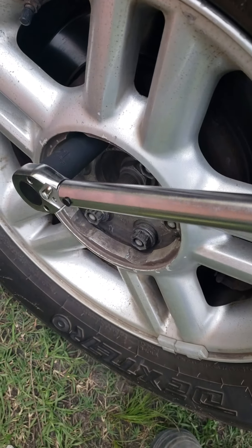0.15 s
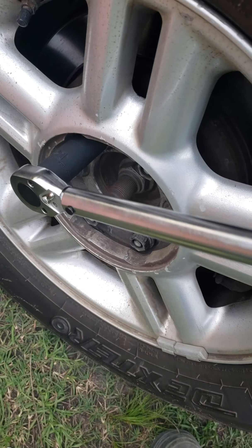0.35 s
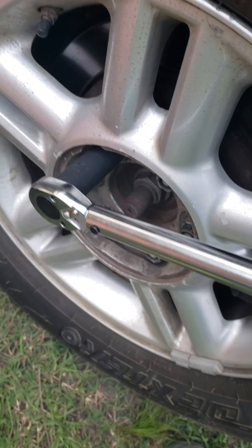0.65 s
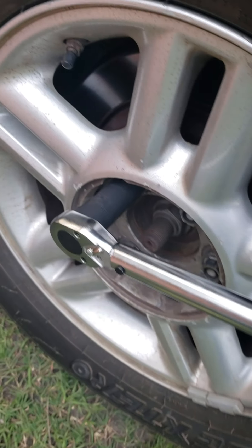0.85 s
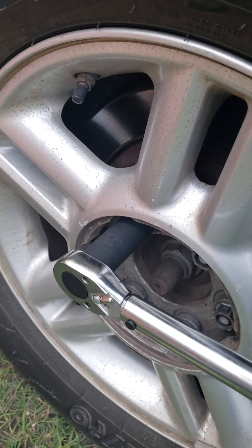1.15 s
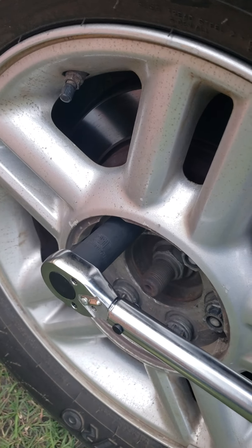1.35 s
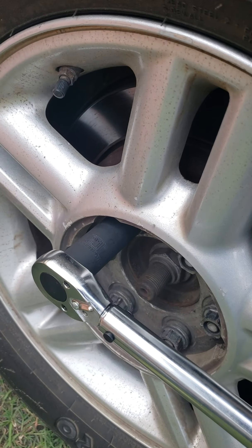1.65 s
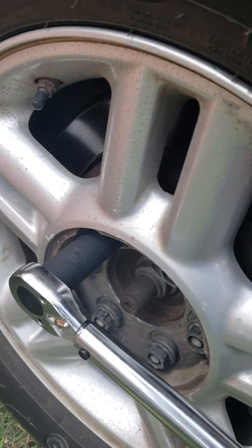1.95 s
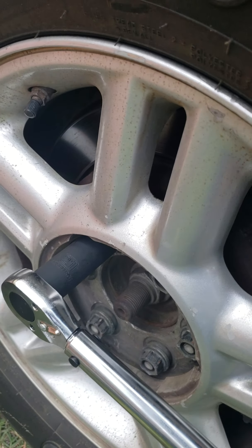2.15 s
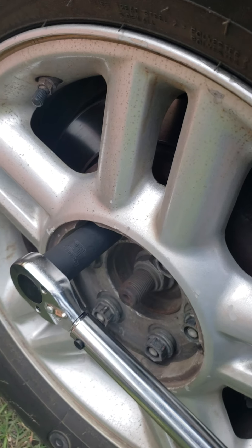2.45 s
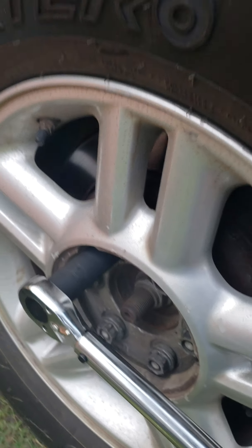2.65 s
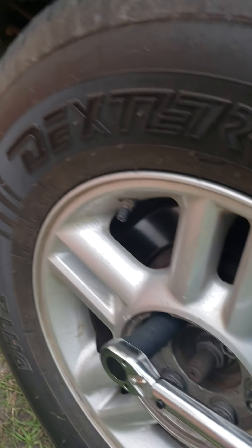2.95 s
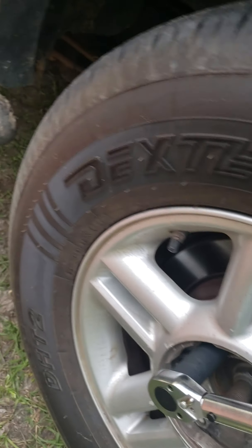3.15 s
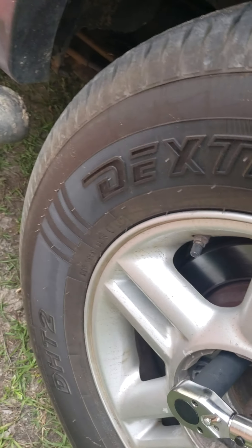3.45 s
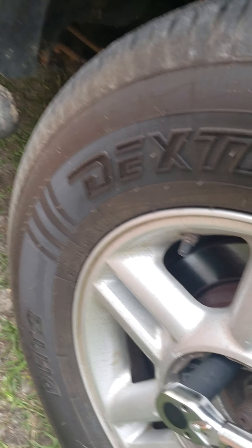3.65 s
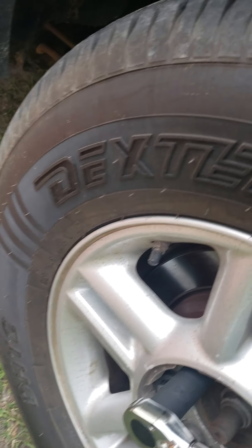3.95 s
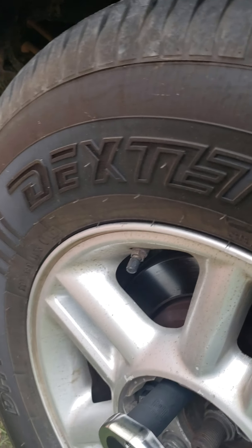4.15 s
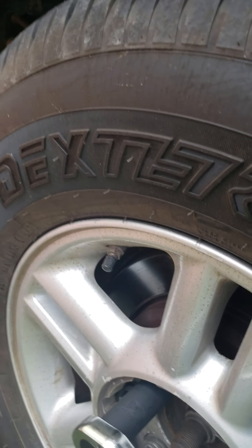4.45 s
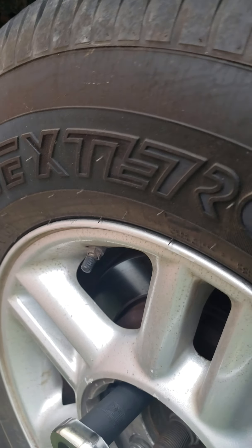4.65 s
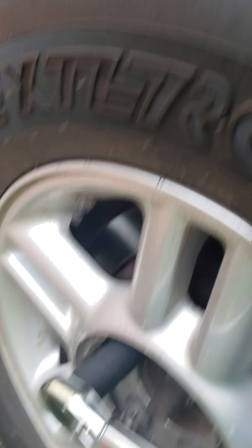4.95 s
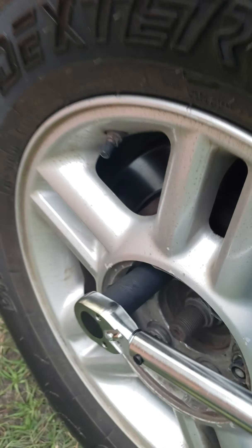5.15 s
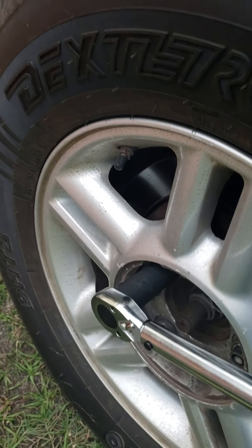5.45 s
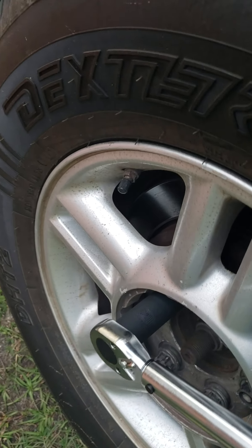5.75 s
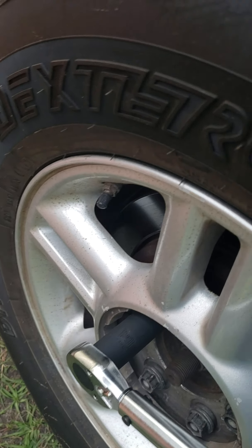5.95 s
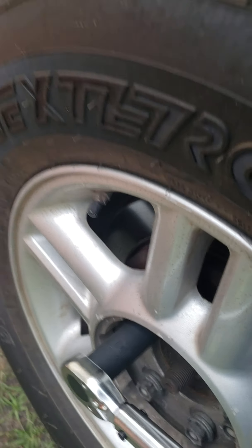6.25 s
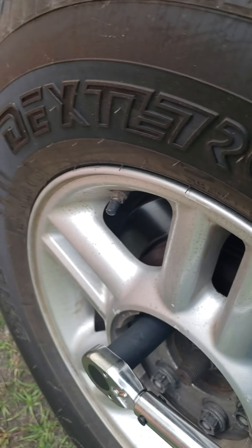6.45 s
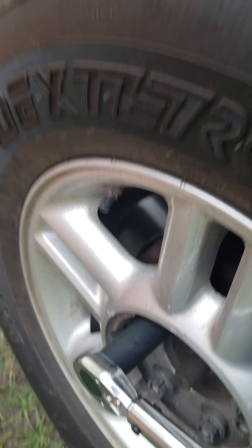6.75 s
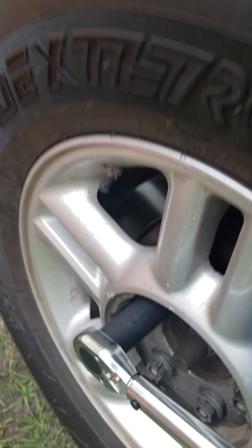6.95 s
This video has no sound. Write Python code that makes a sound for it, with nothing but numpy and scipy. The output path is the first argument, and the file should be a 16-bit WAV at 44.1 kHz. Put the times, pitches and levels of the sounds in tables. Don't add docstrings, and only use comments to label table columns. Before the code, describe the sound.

Close handheld phone outdoors on grass: low gusty rumble and thin distant wash. A wrench gives faint steel ticks and cloth rustles, then about midway its latch breaks with a hard bright crack and snaps back at once. Small clicks follow. Near the end a sharp blow knocks the alloy wheel, tyre thumping and rim ringing briefly, then a dry snap right at the microphone and a soft bump.

```python
import sys
import numpy as np
from scipy import signal
from scipy.fft import rfft, irfft, next_fast_len
from scipy.io import wavfile
from scipy.ndimage import uniform_filter1d

SR = 44100
rng = np.random.default_rng(int(sys.argv[2]) if len(sys.argv) > 2 else 0)


def persist_wave(psi):
    counts = np.round(np.clip(psi, -1, 1) * 32767).astype(np.int16)
    wavfile.write(sys.argv[1], SR, np.atleast_2d(counts).T)


def invert_db(level):
    return 10 ** (np.asarray(level, dtype=float) / 20)


N = 313683


def gain_at(hz, points):
    f, db = np.transpose(points)
    octave = np.log2(np.maximum(hz, 1))
    ends = np.log2(f)
    beyond = np.maximum(ends[0] - octave, 0) + np.maximum(octave - ends[-1], 0)
    return invert_db(np.maximum(np.interp(octave, ends, db) - 30 * beyond, -90))


def colour(x, points):
    size = 4096
    ceps = irfft(np.log(gain_at(np.fft.rfftfreq(size, 1 / SR), points)))
    ceps[1:size // 2] *= 2
    ceps[size // 2 + 1:] = 0
    taps = irfft(np.exp(rfft(ceps)))
    taps = taps / np.sqrt(np.sum(taps ** 2))
    return signal.fftconvolve(x, taps[None], axes=1)[:, :N]


def resonate(x, bands):
    out = 0
    for hz, width, db in bands:
        b, a = signal.iirpeak(hz, hz / width, fs=SR)
        out = out + invert_db(db) * signal.lfilter(b, a, x) * np.sqrt(1000 / width)
    return out


def walk(rate_hz, channels=1):
    k = max(int(SR / rate_hz), 2)
    held = np.repeat(rng.standard_normal((channels, N // k + 1)), k, axis=1)[:, :N]
    return 1.1 * uniform_filter1d(uniform_filter1d(held, k), k)


def pair(alike, length=N):
    mid, side = rng.standard_normal((2, length))
    alike = np.clip(alike, 0, 1)
    sides = side * np.array([[1], [-1]])
    return (np.sqrt(1 + alike) * mid + np.sqrt(1 - alike) * sides) / np.sqrt(2)


def add(out, s, sound):
    i = int(s * SR)
    out[:, i:i + sound.shape[-1]] += sound[..., :N - i]


def ring(modes, scatter_db, push_s=.0001):
    hz, db, t60 = np.transpose(modes)[:, :, None]
    t = np.arange(int(min(t60.max(), .6) * SR)) / SR
    waves = np.exp((2j * np.pi * hz - np.log(1000) / t60) * t) * invert_db(db) / (1 + (hz * push_s) ** 2)
    luck = scatter_db * rng.standard_normal((2, 2, len(modes)))
    heard = invert_db(luck[0]) * np.exp(.3j * luck[1])
    return np.imag(heard @ waves) * (1 - np.exp(-t / push_s))


def crack(t60_s, chatter_db, alike=0.19):
    t = np.arange(int(.25 * SR)) / SR - .0006
    chatter = invert_db(chatter_db * np.repeat(rng.standard_normal(len(t) // 30 + 1), 30)[:len(t)])
    fade = invert_db(-60 * t / max(t60_s, .004)) * chatter
    tail = invert_db(-27 - 60 * t / .12)
    return pair(alike, len(t)) * np.where(t > 0, fade + tail, .08)


def strike(track, modes, hits):
    for s, db in hits:
        add(track, s, invert_db(db) * ring(modes, scatter_db=1.5))


def strokes(rows, rise_db_s, fall_db_s):
    t = np.arange(0, N + 64, 64) / SR
    s, hold, db, *more = np.transpose(rows)[:, :, None]
    db = db - rise_db_s * np.maximum(s - t, 0) - fall_db_s * np.maximum(t - s - hold, 0)
    layers = [db] + [db + m for m in more]
    return [np.interp(np.arange(N) / SR, t, np.sqrt(np.sum(invert_db(2 * d), 0))) for d in layers]


# f/Hz, level/dB, decay/s
HEAD_MODES = [(9640, -1, 0.12), (9960, 0, .045), (11800, -5, .05), (14200, -6, .03), (10380, -5, .06)]


def ticks(rows):
    bright, dull, rings = np.zeros((3, 2, N))
    for s, bright_db, dull_db, t60_s, head_db in rows:
        add(bright, s, invert_db(bright_db) * crack(t60_s, chatter_db=1.8))
        add(dull, s, invert_db(dull_db) * crack(1.3 * t60_s, chatter_db=4.0))
        add(rings, s + .0006, invert_db(bright_db + head_db + 3) * ring(HEAD_MODES, scatter_db=1.5))
    return bright, dull, rings


def steel_noise(bright, dull):
    bright = colour(bright, [(7500, -10), (9500, -8.0), (12000, 3.5), (14000, -0.5), (15200, 4), (16000, -9)])
    dull = colour(dull, [(1200, -14.5), (2500, -5.0), (4500, 0.5), (6000, 6.0), (8000, -12.5)])
    return invert_db(-1.5) * bright + invert_db(-4.5) * dull


# f/Hz, width/Hz, level/dB
HOUSING_BANDS = [(2310, 210, -4.5), (3020, 190, -10.5), (3870, 170, -7), (4600, 130, -4), (4980, 160, -2),
                 (5300, 90, 2), (5877, 120, -8), (5880, 190, -1.5), (6990, 250, -6.5), (7950, 150, -7.5),
                 (8060, 130, -2)]
# t/s, bright level/dB, dull level/dB, decay/s
LATCH_CRACKS = [(3.007, -50, -47, .012), (3.012, -21, -32, .008), (3.0128, -16, -34, .007),
                (3.0141, -16, -34, .007), (3.0154, -17, -34, .012), (3.0212, -6.5, -28, .011),
                (3.0233, -15, -31, .015), (3.0252, -19, -33, .04), (3.0298, -29, -36, .035),
                (3.0344, -45, -42, .11), (3.1368, -26, -35, .018), (3.1483, -11, -26, .016),
                (3.1519, -20, -35, .024), (3.1563, -24, -34, .04), (3.1614, -25, -36, .03),
                (3.1655, -32, -40, .08), (6.1016, -9, -20, .01)]


def latch():
    bright, dull, rings = ticks([(*row, -26) for row in LATCH_CRACKS])
    noise = steel_noise(bright, invert_db(-3.5) * dull)
    return noise + invert_db(-1.5) * resonate(dull, HOUSING_BANDS), rings


# f/Hz, level/dB per Hz
PAWL_BRIGHT_SPECTRUM = [(7500, -15.5), (9500, -8), (11000, 9.5), (13000, 3), (15000, -2.5)]
PAWL_DULL_SPECTRUM = [(1200, -13), (1900, -8.5), (2500, -9), (3500, -15), (4500, 0.5), (5300, -6),
                      (7000, -1)]
# f/Hz, level/dB, decay/s
DRIVE_MODES = [(2480, 1, .22), (2550, -3, .16), (1215, -5, .1), (1300, -12, .2), (3225, -6, .1),
               (3634, -4, .1), (4377, -5, .1), (4800, -8, .1)]
# f/Hz, level/dB per Hz
DRIVE_BUZZ_SPECTRUM = [(2000, -3), (2600, -5), (3600, 2), (4600, -2)]
# t/s, bright level/dB, dull level/dB, head ring/dB against the bright, drive ring level/dB
PAWL_CLICKS = [
    (1.2419, -35, -47.5, -4, -59),
    (2.9032, -31.5, -61.5, -18, -77.5),
    (3.515, -41, -49.5, -8, -78),
    (4.1323, -31, -57, 0.5, -64),
]


def pawl():
    bright, dull, rings = ticks([(*row[:3], 0.0177, row[3]) for row in PAWL_CLICKS])
    drive_hits = [(row[0] + 0.0014, row[4]) for row in PAWL_CLICKS]
    drive, buzz = np.zeros((2, 2, N))
    strike(drive, DRIVE_MODES, drive_hits)
    for s, db in drive_hits:
        buzz_db = -52.5 + 0.95 * (db + 47.0)
        add(buzz, s, invert_db(buzz_db) * crack(0.17, chatter_db=6.0))
    noise = colour(bright, PAWL_BRIGHT_SPECTRUM) + colour(dull, PAWL_DULL_SPECTRUM)
    return noise + colour(buzz, DRIVE_BUZZ_SPECTRUM), rings, drive


# t/s, bright level/dB, dull level/dB
SMALL_TICKS = [(0.0495, -51, -62), (0.474, -78, -60), (1.155, -59, -64), (2.786, -51, -67),
               (2.8075, -52, -68), (2.8868, -49, -63), (2.9536, -50, -57), (3.1325, -40, -38.5),
               (3.409, -57, -64), (3.4763, -57, -61.5), (3.5454, -45, -52), (3.727, -43, -55),
               (4.2953, -71, -80), (4.344, -62, -63), (5.32, -44, -61), (5.391, -43.5, -60),
               (5.5308, -51, -80), (5.7235, -59, -72), (6.029, -38.5, -61), (6.404, -41, -59.5),
               (6.4245, -49, -67), (6.5914, -37.5, -70), (7.0463, -30.5, -63)]


def light_ticks():
    bright, dull, rings = ticks([(*row, 0.019, -36) for row in SMALL_TICKS])
    return steel_noise(bright, dull), rings


# t/s, level/dB
TUBE_MODES = [(5084, 0, 0.6)]
TUBE_STRIKES = [(3.024, -51)]
SPRING_MODES = [(4445, 0, .125)]
SPRING_STRIKES = [(3.031, -42), (3.157, -44), (3.164, -39)]
ROLLER_MODES = [(9960, 0, .045), (8350, -16, .03)]
ROLLER_STRIKES = [(3.022, -30), (3.1375, -38), (3.149, -12)]
PIN_MODES = [(6080, -5, 0.032), (6480, -3, 0.017), (5480, -14.5, 0.034)]
PIN_STRIKES = [(1.2425, -61), (2.9023, -30.5), (3.5134, -38.5), (4.1327, -38.5)]
TANG_MODES = [(5200, 0, .02), (6900, -6, .012)]
TANG_STRIKES = [(3.0125, -33), (3.0158, -27), (3.0216, -23), (3.0262, -32), (3.149, -31)]
PLATE_MODES = [(9640, 0, .15)]
PLATE_STRIKES = [(3.023, -29), (3.151, -36)]
COLLAR_MODES = [(3110, 0, .03)]
COLLAR_STRIKES = [(3.0295, -33), (3.041, -45)]
DETENT_MODES = [(14500, 0, .016), (13200, -5, .014)]
DETENT_STRIKES = [(3.1488, -9), (3.137, -28)]


def firm_parts():
    rings = np.zeros((2, N))
    strike(rings, TUBE_MODES, TUBE_STRIKES)
    strike(rings, SPRING_MODES, SPRING_STRIKES)
    strike(rings, ROLLER_MODES, ROLLER_STRIKES)
    strike(rings, PIN_MODES, PIN_STRIKES)
    strike(rings, TANG_MODES, TANG_STRIKES)
    strike(rings, PLATE_MODES, PLATE_STRIKES)
    strike(rings, COLLAR_MODES, COLLAR_STRIKES)
    strike(rings, DETENT_MODES, DETENT_STRIKES)
    return rings


# t/s, level/dB
HANDLE_MODES = [(3766, -17, .07), (2996, -18, .08), (853, -22, .25), (800, -28, .12)]
HANDLE_STRIKES = [
    (3.029, -34),
    (3.161, -31.5),
]
BEAM_MODES = [(2062, -20, .2), (2420, -17, .14), (2606, -23, .2), (3381, -22, .17), (3790, -13, .1),
              (4030, -15, .2), (4387, -14, .17), (4840, -18, .23), (5233, -12, .12), (5400, -22, .22),
              (5841, -14, .07)]
BEAM_STRIKES = [(3.03, -34), (3.152, -30.5), (3.166, -41)]
SOCKET_MODES = [(6500, -6, .13), (13600, 9, .09), (3940, -18, .12), (1780, -5, .06), (2789, -13, .08),
                (11900, -2, .08), (9300, -6, .08)]
SOCKET_STRIKES = [(3.41, -65), (3.479, -48.5), (4.296, -73), (4.345, -52.5)]
WALL_MODES = [(3940, 0, .16), (3850, -5, .1), (4060, -7, .1)]
WALL_STRIKES = [(4.3, -78), (4.356, -69)]
KNOCK_MODES = [(3930, 2, 0.05), (2720, 3, 0.059), (2440, -5, 0.079), (875, -5, 0.14)]
KNOCK_STRIKES = [
    (0.456, -70),
    (0.475, -57),
]


def loose_parts():
    rings = np.zeros((2, N))
    strike(rings, KNOCK_MODES, KNOCK_STRIKES)
    strike(rings, BEAM_MODES, BEAM_STRIKES)
    strike(rings, WALL_MODES, WALL_STRIKES)
    strike(rings, HANDLE_MODES, HANDLE_STRIKES)
    strike(rings, SOCKET_MODES, SOCKET_STRIKES)
    return rings


def squeak():
    out, length_s = np.zeros((2, N)), 0.024
    start_hz, sag_hz_per_s = 2030, 6700
    t = np.arange(int(length_s * SR)) / SR
    tone = np.sin(2 * np.pi * (start_hz - sag_hz_per_s * t / 2) * t)
    add(out, 4.26, invert_db(-49.5) * np.sin(np.pi * t / length_s) * tone)
    return out


def wrench():
    latch_noise, latch_rings = latch()
    pawl_noise, pawl_rings, drive = pawl()
    tick_noise, tick_rings = light_ticks()
    firm = latch_rings + pawl_rings + tick_rings + firm_parts() + squeak()
    loose = drive + loose_parts()
    rings = firm * invert_db(1.5 * walk(110)) + loose * invert_db(3.5 * walk(250) - 2)
    return latch_noise + pawl_noise + tick_noise + rings


# t/s, hold/s, level/dB, low groan/dB and higher groan/dB against the level
CREEP_SLIDES = [(0.53, .05, -80.5, 1, -20), (0.616, 0.28, -76.5, -6.5, -25), (3.418, 0.1, -81, -11.5, -4),
                (4.264, 0.071, -88, -18, 5), (4.342, 0.013, -75, -15, -7), (4.423, 0.049, -88.5, -23, 2)]
# f/Hz, width/Hz, level/dB
SOCKET_BANDS = [(1800, 380, 1), (2160, 400, -4), (2900, 1000, -9), (3680, 500, -10)]
LOW_GROAN_BANDS = [(500, 170, 0), (940, 150, 0)]


def creep():
    level, *groans = strokes(CREEP_SLIDES, rise_db_s=250, fall_db_s=180)
    t, starts = np.arange(N) / SR, np.array(CREEP_SLIDES)[:, 0]
    latest = np.maximum(np.searchsorted(starts, t) - 1, 0)
    since = np.clip(t - starts[latest], 0, .6)
    turns = np.cumsum(1 - .1 * (since - .18)) / SR
    gains, out = [level] * len(SOCKET_BANDS) + groans, 0
    for (hz, width, db), gain in zip(SOCKET_BANDS + LOW_GROAN_BANDS, gains):
        span = int(SR / width)
        cos, sin = (uniform_filter1d(uniform_filter1d(pair(0.36), span), span) * np.sqrt(span)
                    for _ in range(2))
        angle = 2 * np.pi * hz * turns
        out = out + gain * invert_db(db) * (cos * np.cos(angle) + sin * np.sin(angle))
    return out * invert_db(0.82 * walk(180) + 0.9 * walk(23) + 2.0)


# f/Hz, level/dB, decay/s
TYRE_MODES = [(331, 2, 0.082), (309.8, -10, 0.2), (367, -17.5, 0.024), (520, -11, 0.07), (593, -9.5, 0.051),
              (610, -8, 0.11), (780, -11.5, 0.12), (824, -19, 0.065)]
RIM_MODES = [(581, -13, 0.72), (575, 9, .08), (754, -12, 0.3), (867, 0.5, 0.25), (1470, -9, 0.18),
             (1728, 6, 0.11), (2170, -3, 0.09), (2611, -10, 0.15), (2900, -14, .2), (3004, -3, .11),
             (4344, -8, .3), (4522, -2, .11), (1000, -9, 0.1), (2400, -1, 0.05),
             (393, -12, .4), (520, -4, .06), (1085, -4, .07), (1195, -13, .26), (1350, -6, .14),
                (1943, -3, .07), (3120, -8, .08), (3795, -5, .13), (4100, -9, .2), (5658, -12, .2),
                (5846, -7, .12), (1900, 15, .009), (4500, 14, .012), (3000, 8, .01)]
CAP_MODES = [(9700, 0, .014), (10600, -1, .012), (11900, -6, .01)]
# t/s, level/dB
CAP_STRIKES = [
    (6.1019, -5),
    (6.1032, -11),
    (6.1085, -22),
    (6.1115, -22),
]
# t/s, level/dB
TYRE_BUMPS = [
    (3.04, -52),
    (3.164, -54),
    (5.759, -46),
    (6.64, -35.5),
    (6.923, -44.5),
    (7.003, -22.5),
]
# t/s, level/dB, rattle/dB against it, decay/s
GLANCING_SCUFFS = [(.418, -67, -12, .04), (.458, -60, -14, 0.13), (.475, -50, -15.5, 0.12),
                   (2.785, -58, -5.5, 0.14), (2.861, -59, -21.5, 0.41), (3.011, -48.5, -31, 0.24),
                   (3.154, -55, -20.5, 0.23), (3.519, -54, -8, 0.19), (3.536, -41.5, -30, 0.09),
                   (4.345, -63.5, -22, 0.17)]
# f/Hz, level/dB per Hz
SCUFF_SPECTRUM = [(300, -4), (650, 2.5), (1000, -3), (1600, 0), (2500, -10.5), (4000, -18)]
RATTLE_SPECTRUM = [(500, -8.5), (1500, -25), (3000, -10), (5000, -15), (7000, -7.5), (9000, -10.5),
                   (10000, 2), (12000, -5.5), (14000, -16), (16000, -19.5)]
HUB_SPECTRUM = [(3700, -4.5), (4050, 5.5), (4300, 0), (4550, 3.5), (4800, -10)]
# f/Hz, width/Hz, level/dB
SPOKE_BANDS = [(1180, 110, -9.5), (1950, 110, -0.5), (2330, 420, 3.5), (2900, 150, 0.5), (3740, 160, -2),
               (4200, 110, -0.5), (4390, 120, 0.5), (5870, 160, -7)]


def wheel():
    thumps, rattles, scuffs, hub = np.zeros((4, 2, N))
    blow_s, blow_db, blow_t60_s = 6.101, -15, 0.081
    rim = ring(RIM_MODES, scatter_db=1.0, push_s=0.0002)
    add(thumps, blow_s + 0.00079, invert_db(blow_db - 14.5) * rim)
    for s, db in CAP_STRIKES:
        add(thumps, s, invert_db(db) * ring(CAP_MODES, scatter_db=.5))
    add(rattles, blow_s, invert_db(blow_db + 2) * crack(blow_t60_s, chatter_db=0.0))
    # t/s, level/dB, scuff/dB against it, decay/s, push/s
    pushes = [(blow_s, blow_db, -2.5, blow_t60_s, 0.00076)]
    pushes += [(s, db, -38, 0.27, 0.0014) for s, db in TYRE_BUMPS]
    for s, db, scuff_db, t60_s, push_s in pushes:
        add(thumps, s + .0007, invert_db(db - 6) * ring(TYRE_MODES, scatter_db=.6, push_s=push_s))
        add(scuffs, s, invert_db(db + scuff_db - 6) * crack(1.6 * t60_s, chatter_db=2.6))
    for s, db, rattle_db, t60_s in GLANCING_SCUFFS:
        add(rattles, s, invert_db(db + rattle_db) * crack(t60_s, chatter_db=-2.5))
        add(scuffs, s, invert_db(db - 6) * crack(1.6 * t60_s, chatter_db=2.6))
    high = signal.butter(4, 250, "high", fs=SR, output="sos")
    thumps, scuffs = signal.sosfilt(high, [thumps, colour(scuffs, SCUFF_SPECTRUM)])
    t = np.arange(SR // 2) / SR
    add(hub, blow_s, pair(0.54, SR // 2) * invert_db(-47 - 60 * t / 0.42))
    hub = colour(hub * invert_db(1.3 * walk(130)), HUB_SPECTRUM)
    rattle = colour(rattles, RATTLE_SPECTRUM) + invert_db(-6) * resonate(rattles, SPOKE_BANDS)
    return hub + thumps * invert_db(1.5 * walk(120)) + scuffs + rattle


# t/s, f/Hz, level/dB, length/cycles
LEFT_SNAP = [(6.81594, 4600, -5, 3.0), (6.81606, 1950, -6, 2.0), (6.8158, 15500, -22, 8.0),
             (6.8158, 10500, -20, 6.0), (6.8168, 600, -29, 1.5), (6.8176, 3200, -37, 5.0)]
RIGHT_SNAP = [(6.8156, 12000, -8, 8.0), (6.8156, 15000, -4, 8.0), (6.8158, 3800, -25, 3.5),
              (6.8161, 11800, -24, 24.0), (6.8157, 7400, -33, 6.0), (6.8155, 380, -29, 1.5)]


def snap():
    out = np.zeros((2, N))
    for port, bursts in enumerate((LEFT_SNAP, RIGHT_SNAP)):
        for s, hz, db, cycles in bursts:
            turn = np.arange(int(cycles * SR / hz)) * hz / SR
            swell = np.sin(np.pi * turn / cycles)
            add(out[port:port + 1], s, invert_db(db) * swell * np.sin(2 * np.pi * turn))
    return signal.sosfilt(signal.butter(2, 250, "high", fs=SR, output="sos"), out)


# t/s, hold/s, fine rustle level/dB, coarse scrape/dB against it
CLOTH_STROKES = [(.04, 0.047, -75, -11), (.64, 0.17, -75.5, -10.5), (.955, 0.043, -58, -12),
                 (1.1, .03, -58.5, -8), (1.18, 0.12, -62.5, -22), (1.32, 0.053, -56, -28),
                 (1.39, 0.099, -51.5, -26.5), (1.6, 0.086, -52.5, -22), (1.83, 0.12, -56, -30),
                 (2.035, 0.057, -50.5, -24), (2.2, .16, -50.5, -16.5), (2.39, 0.049, -47, -13.5),
                 (2.6, 0.13, -61, -16.5), (2.77, 0.052, -57, -16), (2.9, 0.33, -65, -4.5),
                 (3.41, 0.17, -70.5, -7), (3.73, 0.045, -52.5, -15), (3.86, 0.035, -55.5, -14.5),
                 (3.95, 0.13, -52.5, -17), (4.34, 0.034, -71, -6.5), (4.8, 0.086, -72, -17),
                 (5.0, 0.18, -64, -13), (5.19, 0.16, -54.5, -14.5), (5.39, 0.02, -54.5, -13),
                 (5.53, 0.088, -62, -11.5), (5.74, 0.08, -58, -13.5), (5.9, 0.2, -61, -18),
                 (6.14, 0.053, -39.5, -13.5), (6.32, 0.13, -63, -11.5), (6.59, 0.13, -48, -9),
                 (6.74, 0.21, -56.5, -4.5),
    (7.02, 0.041, -49, -14.5),
]
# f/Hz, level/dB per Hz
FINE_SPECTRUM = [(6000, -39.5), (8500, -17.5), (10000, -6.5), (12000, 0.5), (13500, 1), (16000, 2)]
COARSE_SPECTRUM = [(1500, -11), (3000, -12.5), (4000, -9.5), (6000, -7), (7800, 1.5), (10000, -7),
                   (12000, -13.5)]


def cloth():
    fine_gain, coarse_gain = strokes(CLOTH_STROKES, rise_db_s=268, fall_db_s=193)
    grain = invert_db(2.0 * walk(900, channels=2) + 1.2 * walk(45))
    fine = colour(pair(0.) * grain, FINE_SPECTRUM) * np.hypot(fine_gain, invert_db(-80.5)) * invert_db(2.5)
    coarse = colour(pair(0.) * grain, COARSE_SPECTRUM) * np.hypot(coarse_gain, invert_db(-104.5)) * invert_db(-3.5)
    lower = signal.sosfilt(signal.butter(2, 12500, fs=SR, output="sos"), fine)
    upper = fine - lower
    return lower * invert_db(1.2 * walk(8.6)) + upper * invert_db(1.3 * walk(5) - 1.5) + coarse


# t/s, hold/s, level/dB
BOOT_DRAGS = [
    (6.13, 0.091, -48),
    (6.66, 0.07, -54.5),
    (6.8, 0.18, -64.5),
]
# f/Hz, level/dB per Hz
GRASS_SPECTRUM = [(500, 1), (1200, -1.5), (2000, -5), (3000, -9.5), (4500, -10), (6500, -6)]


def boot():
    drag, = strokes(BOOT_DRAGS, rise_db_s=398, fall_db_s=226)
    return colour(pair(0.13) * invert_db(1.3 * walk(280)), GRASS_SPECTRUM) * drag


# t/s, wind level/dB
GUSTS = [(0.0, -64), (0.57, -59.5), (0.87, -66), (1.68, -58.5), (1.92, -52), (2.3, -55.5), (2.87, -54.5),
         (3.11, -59.5), (3.72, -60.5), (4.12, -65.5), (4.51, -64.5), (4.81, -62), (4.95, -62), (5.78, -56),
         (6.16, -54.5), (6.5, -54), (6.91, -49), (7.11, -49)]
# t/s, hold/s, deep thud level/dB, higher thud/dB against it
WEIGHT_SHIFTS = [(.58, 0.1, -60.5, -27), (2.4, 0.01, -51, -9.5), (2.83, 0.039, -48, -10),
                 (3.56, 0.015, -48.5, -13.5), (3.72, 0.13, -56, -23.5), (4.45, 0.042, -57.5, -18),
                 (5.98, 0.012, -46, -28.5), (6.1, 0.11, -51, -3), (6.93, 0.017, -44.5, -21)]
# f/Hz, level/dB per Hz
RUMBLE_SPECTRUM = [(15, -45.5), (25, -19.5), (54, -1.5), (70, 3.5), (122, -5.5), (145, -9.5), (180, -15.5),
                   (230, -42.5), (400, -120)]
LOW_WASH_SPECTRUM = [(120, -4), (170, 2.5), (260, -1), (350, -10.5), (450, -24), (600, -29.5)]
FAR_WASH_SPECTRUM = [(300, -5.5), (500, -4), (900, 2.5), (1300, -1.5), (2000, -6), (3500, -11.5),
                     (7000, -18), (16000, -17.5)]
HISS_SPECTRUM = [(2500, -4), (5000, 9), (9000, 0), (15500, 4.5)]


def air():
    gust_s, wind_db = np.transpose(GUSTS)
    gust_db = np.interp(np.arange(N) / SR, gust_s, wind_db)
    deep, higher = strokes(WEIGHT_SHIFTS, rise_db_s=208.5, fall_db_s=121.5)
    swell_db = gust_db + 60
    rumble_gain = np.hypot(invert_db(gust_db + 2.5), deep) * invert_db(1.6 * walk(10))
    low_gain = np.hypot(invert_db(-74 + 0.76 * swell_db), higher) * invert_db(4.5 + 0.41 * walk(10.0))
    far_gain = invert_db(-78 + 0.81 * swell_db + .8 * walk(40))
    rumble = colour(pair(.92), RUMBLE_SPECTRUM) * rumble_gain
    low = colour(pair(0.66), LOW_WASH_SPECTRUM) * low_gain
    far = colour(pair(0.036), FAR_WASH_SPECTRUM) * far_gain
    return rumble + low + far + colour(pair(0.), HISS_SPECTRUM) * invert_db(-91.5)


# f/Hz, level/dB
LEFT_SHADE = [(100, 0.5), (550, 1.5), (1000, -1), (2000, -1), (3300, 1.5), (4500, -1), (6000, -6.5),
              (7000, -13), (8200, -31), (9300, -21.5), (11000, -18.5), (13000, -12.5), (16000, -6)]


def ports(x, lag_s):
    size = next_fast_len(N)
    hz = np.fft.rfftfreq(size, 1 / SR)
    f, db = np.transpose(LEFT_SHADE)
    shade = invert_db(np.interp(np.log(hz + 1), np.log(f), db))
    delay = np.exp(-2j * np.pi * hz * lag_s)
    return np.array([irfft(rfft(x[0], size) * shade * delay, size)[:N], x[1]])


def scene():
    near = wrench() + creep() + wheel() + cloth() + boot()
    return ports(near, lag_s=0.00025) + ports(air(), lag_s=0) + snap()


def roll_off(x):
    return signal.sosfilt(signal.butter(12, 17150, fs=SR, output="sos"), x)


def record(dry):
    top = 1.05
    rounded = np.tanh(dry / top) * top
    mix = signal.sosfilt(signal.ellip(6, .2, 30, 15750, fs=SR, output="sos"), rounded)
    return roll_off(mix)


dry = scene()
out = record(dry)
persist_wave(out)
```